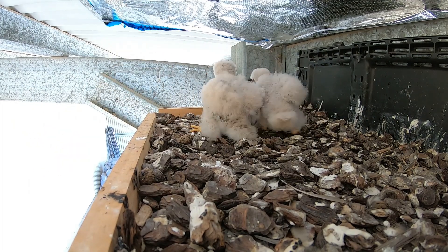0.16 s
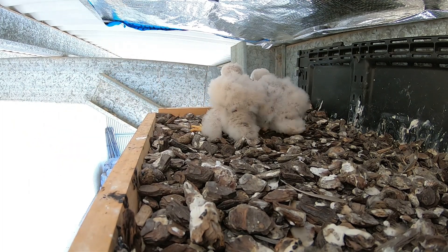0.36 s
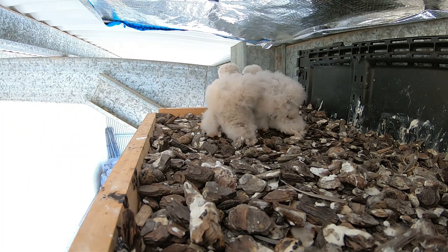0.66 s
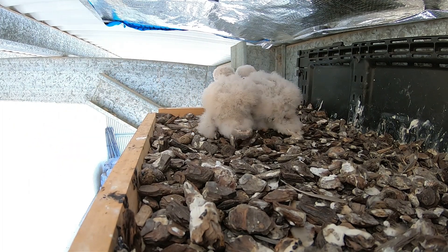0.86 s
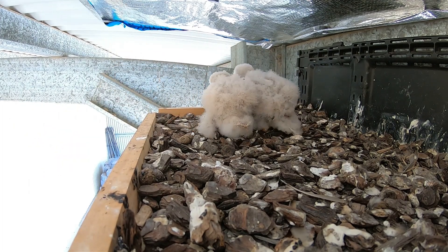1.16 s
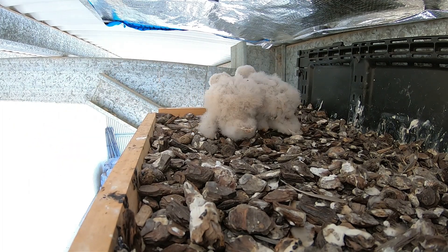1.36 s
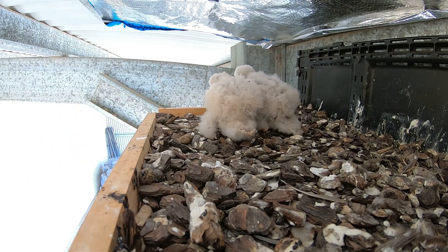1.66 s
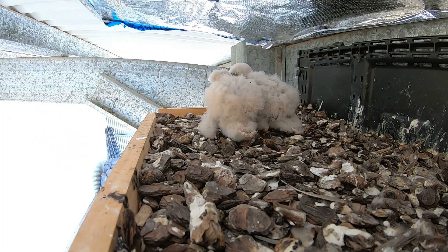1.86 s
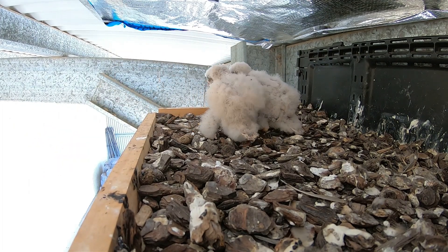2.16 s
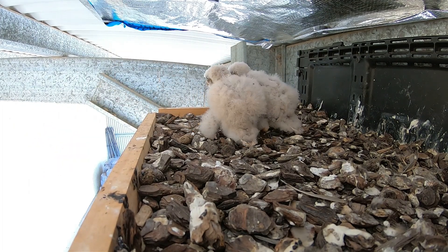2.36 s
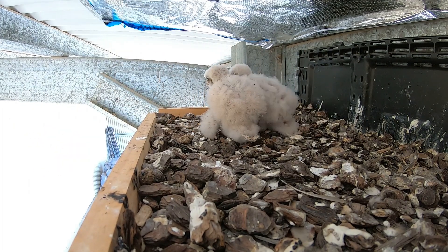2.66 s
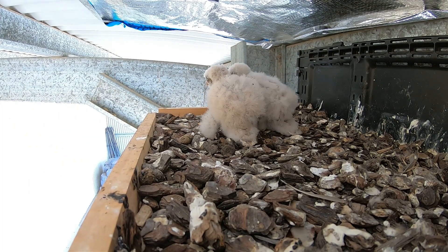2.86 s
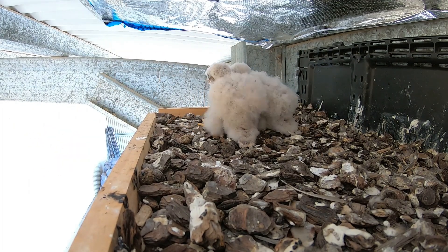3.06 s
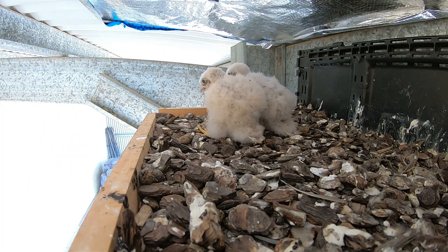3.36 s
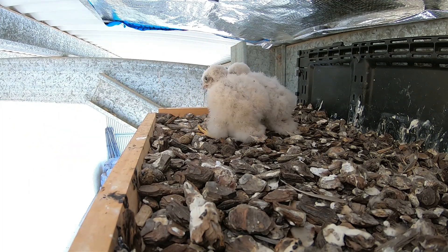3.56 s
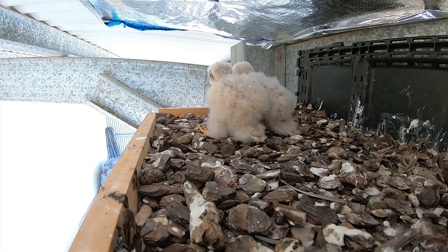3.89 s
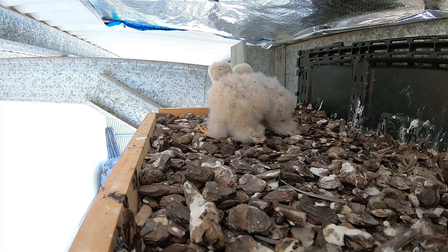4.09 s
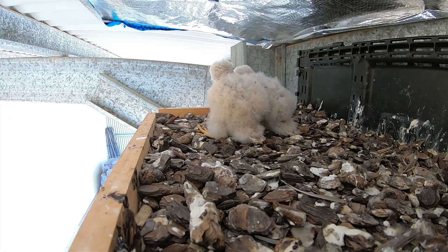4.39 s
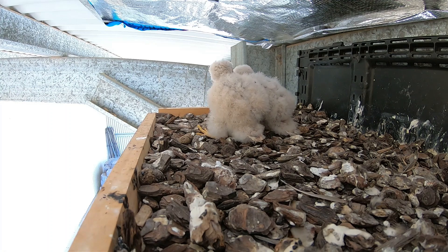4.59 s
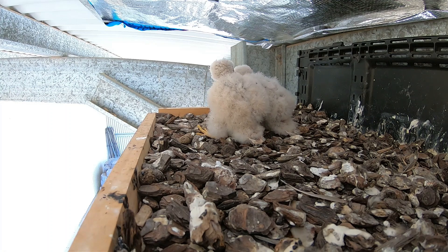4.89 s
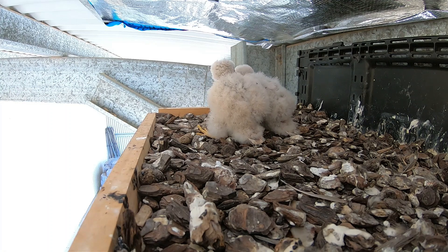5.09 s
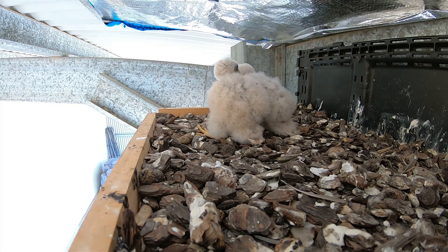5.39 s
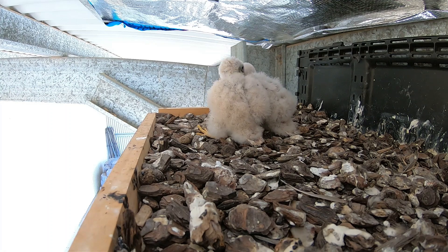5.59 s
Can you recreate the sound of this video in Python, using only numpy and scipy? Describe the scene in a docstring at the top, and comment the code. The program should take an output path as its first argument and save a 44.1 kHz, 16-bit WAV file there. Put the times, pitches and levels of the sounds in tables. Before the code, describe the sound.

Two downy falcon chicks whistle loud, harsh trilling cries in a bark-lined nest box, with faint peeps, soft footfalls and rustling chips.

```python
"""Trilling falcon chicks in a wooden nest box

Each cry is a clear whistle: harmonics of a gliding pitch, filtered by throat resonances. It trills about
13 times a second and breaks into short rasps by noise modulation. A smaller chick peeps in hoarse sines.
Feet excite the damped modes of a tray, wood chips rustle as grainy noise, wind presses on the stereo
microphone in gusts, and shaped noise gives a far hum and hiss. Wall echoes and a dull tail follow the voices."""
import sys
import numpy as np
from scipy import signal
from scipy.fft import rfft, irfft, next_fast_len
from scipy.io import wavfile

SR = 44100
rng = np.random.default_rng(int(sys.argv[2]) if len(sys.argv) > 2 else 0)


def to_wav(sig):
    """Store sig (one row per channel, or 1-D mono) as 16-bit WAV at the path in sys.argv[1].

    Samples outside -1..1 are clipped; the rate is SR.
    """
    pcm = np.clip(np.atleast_2d(sig), -1, 1) * 32767
    pcm = np.round(pcm).astype(np.int16)
    wavfile.write(sys.argv[1], SR, pcm.T)  # frames by channels


N = 253134

# Cries: f/Hz of the closing droop, basic brightness per overtone step/dB at start and at end,
# left minus right/dB, brightness gained per dB of effort, octave overtone lift/dB, lingering at turns (0-1),
# then the crests and troughs of the trill: (t/s, f/Hz, effort level/dB before the loss by gliding)
CRY_TRILLS = [ (1916, 2, 4, 0.3, -0.21, 2, 0.52, [(0.0, 2790, -30.5), (0.048, 2293, -38),
              (0.079, 2690, -28.5), (0.116, 2151, -32.5), (0.181, 2290, -46), (0.2, 2280, -39),
              (0.229, 2950, -30), (0.248, 2804, -33.5), (0.262, 2710, -22.5)]),
              (2600, 6, -4, 0.3, -0.35, -8, 0.3, [(0.288, 2750, -41.5), (0.342, 3210, -40),
              (0.382, 2446, -42), (0.401, 2980, -36), (0.415, 2730, -44)]),
              (2850, 2.5, 4.5, 1.4, -1.5, -6.3, 0.24, [(0.434, 2790, -33), (0.48, 2636, -29.5),
              (0.495, 2990, -32)]), (1810, 1.8, 1.4, 1.3, -0.54, 1, 0.38, [(0.509, 2533, -25),
              (0.524, 2888, -28), (0.555, 2365, -30.5), (0.583, 2813, -28.5), (0.626, 2263, -30),
              (0.667, 2850, -32), (0.71, 2134, -30.5), (0.74, 2840, -28), (0.758, 2770, -28),
              (0.782, 2250, -29)]), (2980, 7, 5, 0.3, -0.027, 4, 0.4, [(0.685, 2516, -24.5),
              (0.71, 2850, -38)]), (1923, -1, 3, 0.3, -0.47, -1, 0.57, [(0.77, 2752, -26.5),
              (0.798, 2813, -35), (0.825, 2550, -33), (0.866, 2907, -33.5), (0.885, 2727, -35),
              (0.93, 2820, -35.5), (0.985, 2432, -35), (1.018, 2846, -31), (1.055, 2348, -34),
              (1.083, 2707, -32.5), (1.128, 2600, -30), (1.17, 2680, -31), (1.212, 2190, -35.5),
              (1.259, 2660, -33), (1.303, 2308, -36), (1.334, 2740, -29), (1.368, 2210, -31.5)]),
              (1810, 3, -7, 0.3, -0.45, -7, 0.23, [(0.955, 2360, -44), (0.964, 2536, -23)]),
              (1960, 0.9, 3, 0.3, -0.21, -1.9, 0.23, [(1.568, 2507, -37.5), (1.616, 2195, -42),
              (1.643, 2380, -44.5), (1.682, 2198, -41), (1.714, 2443, -44), (1.747, 2186, -36.5),
              (1.795, 2305, -45.5), (1.838, 2195, -38), (1.877, 2317, -44.5), (1.905, 2205, -38),
              (1.944, 2306, -48.5), (1.972, 2233, -35)]),
              (1930, -0.2, 3, 0.3, -0.35, -0.5, 0.22, [(2.172, 2683, -37), (2.215, 2366, -37.5),
              (2.247, 2690, -36.5), (2.266, 2315, -39.5), (2.288, 2255, -40.5), (2.318, 2644, -29),
              (2.36, 2210, -41.5), (2.395, 2598, -29.5), (2.434, 2158, -42), (2.463, 2500, -29.5),
              (2.49, 2168, -40), (2.503, 2162, -33)]),
              (2048, -2.5, 4.5, 1.7, -0.35, -0.5, 0.38, [(2.696, 2313, -39.5), (2.736, 2254, -40.5),
              (2.761, 2576, -29.5), (2.807, 2162, -41), (2.845, 2440, -34), (2.872, 2423, -33),
              (2.897, 2630, -29), (2.927, 2156, -35.5), (2.96, 2075, -34.5)]),
              (1900, 0.5, -2.5, 2.7, -0.61, -6, 0.45, [(3.153, 2497, -35.5), (3.2, 2185, -32.5),
              (3.222, 2560, -35.5), (3.271, 2278, -36), (3.3, 2638, -30), (3.347, 2175, -37),
              (3.376, 2530, -30.5), (3.425, 2175, -36), (3.452, 2433, -28.5), (3.497, 2267, -34)]),
              (1996, -6.5, -0.4, 3.8, -0.46, -0.6, 0.41, [(3.726, 2268, -38), (3.77, 2190, -40),
              (3.799, 2447, -32.5), (3.839, 2169, -40.5), (3.876, 2446, -30.5), (3.92, 2117, -38.5),
              (3.972, 2438, -30.5), (3.992, 2316, -33), (4.021, 2484, -32.5), (4.05, 2215, -35),
              (4.07, 2166, -34.5)]), (1980, -2, -1, 1.9, -0.03, 2, 0.19, [(4.257, 2362, -36),
              (4.296, 2251, -34.5), (4.32, 2542, -32.5), (4.363, 2141, -35), (4.394, 2371, -32.5),
              (4.43, 2205, -30.5), (4.469, 2424, -31), (4.516, 2168, -30.5), (4.556, 2297, -30),
              (4.576, 2253, -32.5)]), (2040, -7, -3, 0.69, -0.0062, 4, 0.1, [(4.87, 2467, -33.5),
              (4.91, 2239, -33), (4.942, 2459, -30), (4.986, 2131, -36), (5.018, 2380, -31.5),
              (5.056, 2216, -33.5), (5.089, 2440, -30.5), (5.13, 2218, -29), (5.162, 2405, -29),
              (5.208, 2205, -31.5), (5.254, 2375, -32.5), (5.279, 2230, -33)]), ]
# Resonances of windpipe and open beak, about 2 kHz apart: f/Hz, gain level/dB
THROAT_GAIN = [(1300, -31), (1950, -3), (2300, -5), (2750, -0.5), (3900, -8.5), (4250, -6), (4600, -3),
               (5500, -21), (6000, -21), (6300, -17), (6650, -14.5), (7750, -41.5), (8650, -31),
               (9600, -44.5), (11000, -55.5), (15600, -69)]
# Spells in which the voice breaks up: start t/s, end t/s, added roughness (0-1)
RASP_SPELLS = [(0.022, 0.057, 0.46), (0.09, 0.1, 0.52), (0.163, 0.229, 0.36), (0.264, 0.281, 0.77),
               (0.287, 0.443, 0.65), (0.445, 0.515, 0.33), (0.49, 0.825, 0.33), (0.992, 1.086, 0.22),
               (1.335, 1.375, 0.26), (1.873, 1.891, 0.85), (1.967, 1.98, 0.25), (2.228, 2.268, 0.82),
               (2.321, 2.35, 0.2), (2.403, 2.424, 0.8), (2.47, 2.496, 0.69), (2.902, 2.942, 0.23),
               (3.237, 3.244, 0.85), (3.283, 3.344, 0.17), (3.387, 3.422, 0.65), (3.475, 3.494, 0.55)]
# One-note peeps of a smaller chick: start t/s, end t/s, f/Hz, direct rms level/dB
PEEP_NOTES = [(.297, .325, 3405, -43.5), (.33, .372, 3490, -44), (.395, .425, 3444, -39.5),
              (.455, .495, 3580, -52), (.507, .557, 3430, -38), (.579, .62, 3400, -38.5),
              (.648, .69, 3415, -36), (.72, .762, 3395, -41), (.787, .808, 3380, -59),
              (.855, .893, 3423, -38), (1.022, 1.04, 3480, -46), (3.84, 3.91, 3410, -72)]
# Faint soft tones that come and go: start t/s, end t/s, f/Hz, direct rms level/dB
FAINT_TONES = [(.8, 2.0, 342.7, -76.5), (2.0, 2.55, 246.7, -68), (3.35, 4.0, 248.8, -66),
               (4.0, 4.5, 289, -71.5), (5.425, 5.495, 860, -71), (5.55, 5.6, 1104, -76)]
# Feet on the tray: first touch t/s, relative strike level/dB, crack level relative to the strike/dB
FOOTFALLS = [(0.185, -21.5, -26), (0.198, -17, -32), (0.315, -23, -28), (0.4, -10.5, -34.5),
             (0.756, -23, -19.5), (1.341, -30.5, -52), (2.325, -35, -52), (2.767, -26, -22.5),
             (2.78, -27, -16.5), (2.797, -25, -30), (3.246, -22, -26)]
# Modes of the tray: f/Hz, relative level/dB, decay time by 60 dB t/s
TRAY_MODES = [(143, -15.5, 0.31), (187, 6, 0.07), (251, 1.5, 0.09), (310, -2, 0.045), (487, -45.5, 0.03)]
# Spectrum of the cracking chips: f/Hz, relative density level/dB
CRACK_SPECTRUM = [(300, -18.5), (4000, -20.0), (10000, -20), (12000, -38)]
# Feet scuffing through the chips: t/s, time to fall by 20 dB t/s, level/dB before the side balance
SCUFF_EVENTS = [(0.146, 0.64, -52), (.75, 0.21, -59.5), (1.307, 0.16, -52), (1.96, 0.6, -57),
                (2.3, 0.057, -54), (2.749, 0.11, -46.5), (3.227, 0.1, -45), (4.512, 0.19, -49.5),
                (4.899, 0.11, -64.5), (5.569, 0.32, -62.5)]
# Spectrum of the rustling chips: f/Hz, relative density level/dB
CHIP_SPECTRUM = [(150, -12.5), (300, -2.5), (600, -6.5), (1300, -12.5), (2000, -23.5), (6000, -36.5),
                 (15000, -84.5)]
# Spectrum of the tray rumble: f/Hz, relative density level/dB
RUMBLE_SPECTRUM = [(60, -34.5), (120, -6), (165, 4.5), (200, 6.5), (260, 1), (350, -5.5), (900, -57.5)]
# Gusts on the microphone: t/s at the top, level/dB added to the calm wind
GUSTS = [(0.277, -45), (0.454, -45), (0.645, -60.5), (0.837, -48), (1.049, -59.5), (1.409, -51),
         (2.808, -61.5), (3.298, -52), (3.424, -55.5), (4.049, -54.5), (4.221, -49), (4.518, -60),
         (4.952, -57)]
# Spectrum of the wind pressure: f/Hz, relative density level/dB
WIND_SPECTRUM = [(10, -26.0), (35, 6.0), (60, -1), (110, -9.0), (200, -43), (400, -85)]
# Wavering hum: f/Hz, width of each of two resonances/Hz, rms level/dB
HUM_BANDS = [(181.6, 43, -73)]
# Spectrum of the far air noise: f/Hz, relative density level/dB
AIR_SPECTRUM = [(300, -24), (550, -15), (900, -13.5), (1500, -18), (2200, -19), (3200, -57), (5500, -39),
                (7000, -30), (10500, -32), (11500, -40), (15700, -72)]
# Left-right likeness of the noises: f/Hz, correlation (-1 to 1)
EAR_LIKENESS = [(30, 0.1), (100, 0.7), (220, 0.69), (400, 0.39), (800, -0.6), (1300, -0.66), (2500, 0.4),
                (4300, 0.5), (8000, -0.2)]
# Side wall echoes: delay t/s, level/dB before the treble emphasis
WALL_ECHOES = [(.00009, -14), (.00066, -9), (.00177, -21.5), (.0031, -21), (.0047, -6.5)]

ATTACK_S, RELEASE_S = 0.0045, 0.007
DROOP_S, DROOP_DB = 0.023, 1.5   # after the last turn: duration of the droop, change of effort meanwhile
DROOP_SWING = 0.88   # share of a half cosine that the droop runs before the voice stops
USUAL_HZ, USUAL_DB = 2400, -33   # reference pitch and effort for the brightness
BRIGHT_DB_PER_KHZ = -4   # overtones stand out when the voice is lower than usual
GLIDE_DB_PER_KHZ_S = 0.2639   # loss of effort while the pitch glides
FALL_LIFT_DB, FALL_KHZ_PER_S = 3, 6   # limit of the octave swell, glide rate that scales it
RASP_EDGE_S = 0.004
GUST_HALF_S = 0.063   # from the top of a gust to 1/e of it
SHRILL_HZ, SHRILL_WIDTH_HZ, SHRILL_DB = 4340, 820, -67.5   # steady far hiss: same columns as the hum
AIR_DB = -70.5   # rms
YARD_T60_S, YARD_DB, YARD_CUT_HZ = 0.48, -18, 1900
CUTOFF_HZ = 15700


def trill(turns, droop_hz, linger):
    """Cosine interpolation: pitch and effort swing from turn to turn, slowest at each turn."""
    droop = (turns[-1][0] + DROOP_S, droop_hz, turns[-1][2] + DROOP_DB)
    turn_s, turn_hz, turn_db = np.transpose(turns + [droop])
    i = np.arange(round(turn_s[0] * SR), round(turn_s[-1] * SR))
    count = np.arange(len(turn_s))
    place = np.interp(i / SR, turn_s, count)
    reach = np.where(place < len(turn_s) - 2, 1, DROOP_SWING)
    trilling = np.minimum(place, len(turn_s) - 2)
    place -= np.clip(linger, 0, 1) * np.sin(2 * np.pi * trilling) / (4 * np.pi)
    swing = (1 - np.cos(np.pi * reach * (place % 1))) / (1 - np.cos(np.pi * reach))
    place = place // 1 + swing
    return i, turn_s, np.interp(place, count, turn_hz), np.interp(place, count, turn_db)


def throat(voices):
    """Source-filter principle: windpipe and beak weight the harmonics by a fixed resonance curve."""
    size = next_fast_len(N + SR // 10)
    hz = np.maximum(np.fft.rfftfreq(size, 1 / SR), 10)
    return irfft(rfft(voices, size) * amp(at_hz(THROAT_GAIN, hz)), size)[:, :N]


def cries():
    """Harmonic synthesis with irregular modulation: uneven membrane beats shake phase and level in a rasp."""
    out = np.zeros((2, N))
    rough = 0.023 + sum(depth * gate(a, b, RASP_EDGE_S) for a, b, depth in RASP_SPELLS)
    shake, flutter, breath = drift(730), drift(240), rng.standard_normal(N)
    # the harmonics waver quickly in level, each following one of three random courses/dB
    waver = np.array([1.4 * drift(22), 2.6 * drift(40), 3.2 * drift(60)])
    for droop_hz, first_db, last_db, pan_db, per_db, octave_db, linger, turns in CRY_TRILLS:
        i, turn_s, pitch, effort = trill(turns, droop_hz, linger)
        t = i / SR
        start, end = turn_s[[0, -1]]
        phase = 2 * np.pi * np.cumsum(pitch) / SR + .5 * rough[i] * shake[i]
        above_khz = (pitch - USUAL_HZ) / 1000
        glide = np.gradient(above_khz) * SR   # kHz per s
        effort -= GLIDE_DB_PER_KHZ_S * np.abs(glide)
        bright = np.interp(t, [start, end], [first_db, last_db])
        bright += BRIGHT_DB_PER_KHZ * above_khz + per_db * (effort - USUAL_DB)
        bright = np.clip(bright, -12, 6)
        # the octave swells while the pitch falls and thins while it rises
        octave = octave_db - FALL_LIFT_DB * np.tanh(glide / FALL_KHZ_PER_S)
        voice = 0.19 * rough[i] * breath[i]   # air rushes past membranes that close badly
        for k in range(7):
            level_db = min(k, 3) * bright + (k == 1) * octave + waver[k % 3, i]
            voice += amp(level_db) * np.sin((k + 1) * phase + k)
        already_sounding = start == 0   # no attack for a cry under way at time 0
        attack = (t - start + already_sounding) / ATTACK_S
        fade = np.clip(np.minimum(attack, (end - t) / RELEASE_S), 0, 1)
        gain = np.sqrt(2) * amp(effort + pan_db / 2 * np.array([[1], [-1]]))
        out[:, i] += gain * voice * fade * (1 + 0.4 * rough[i] * flutter[i])
    return throat(out)


def notes(table, hoarse):
    """Phase modulation: sine whistles arch slightly in pitch, and random phase makes them hoarse."""
    t, out = np.arange(N) / SR, 0
    flutter = drift(200) + 0.63 * drift(1100)
    for a, b, hz, level_db in table:
        # this phase raises the pitch by up to 1.6 percent of hz per... scaled so that it peaks midway
        arch = 0.032 * hz * (b - a) * np.cos(np.pi * (t - a) / (b - a))
        whistle = np.sin(2 * np.pi * hz * t - arch + hoarse * flutter)
        out = out + amp(level_db) * gate(a, b, 0.0082) * whistle
    return np.sqrt(2) * out


def box(near):
    """Image-source echoes reach the two ports with opposite sign; the yard returns a decaying noise tail."""
    x = near.mean(axis=0)
    i = np.arange(N)
    side = sum(amp(db) * np.interp(i - lag * SR, i, x, left=0) for lag, db in WALL_ECHOES)
    side = signal.lfilter([1, -.4], [1], side)   # the ports differ more in the treble
    t = np.arange(SR) / SR
    tail = rng.standard_normal((2, SR)) * amp(-60 * t / YARD_T60_S) * np.clip(t / 0.0099, 0, 1)
    tail = signal.sosfilt(signal.butter(1, YARD_CUT_HZ, fs=SR, output="sos"), tail)
    tail /= np.sqrt(np.sum(tail ** 2, axis=1, keepdims=True))
    yard = signal.fftconvolve(x[None], tail, axes=1)[:, :N]
    return near + side * [[1], [-1]] + amp(YARD_DB) * yard


def thumps():
    """Modal excitation: a footfall is an impulse to the damped modes of the tray; the chips under it crack."""
    out, crack = np.zeros(N), np.zeros(N)
    at, strike_db, crack_db = np.transpose(FOOTFALLS)
    at = np.round((at + 0.0027) * SR).astype(int)   # tray and chips answer just after the first touch
    chance_db = rng.normal(0, 2.5, (len(at), len(TRAY_MODES)))
    for k, (hz, level_db, t60) in enumerate(TRAY_MODES):
        clicks = np.full(N, 1e-18)
        clicks[at] = amp(strike_db + level_db - 18.0 + chance_db[:, k])
        r, w = amp(-60 / (t60 * SR)), 2 * np.pi * hz / SR
        out += signal.lfilter([0, np.sin(w)], [1, -2 * r * np.cos(w), r * r], -clicks)
    # a padded foot lands softly
    out = signal.sosfilt(signal.butter(2, [90, 500], "band", fs=SR, output="sos"), out)
    crack[at] = amp(strike_db + crack_db)
    crack = signal.lfilter([1], [1, -amp(-60 / (0.09 * SR))], crack + 1e-18)   # falls 60 dB in 0.09 s
    return out * amp([[-.8], [.8]]) + crack * coloured(rng.standard_normal((2, N)), CRACK_SPECTRUM)


def shuffling():
    """Amplitude-modulated noise: chips rustle in grains after each scuff; the tray rumbles, more under feet."""
    t = np.arange(N) / SR
    feet = np.zeros(N)
    for start, length, db in SCUFF_EVENTS:
        fall_db = 20 * np.maximum(t - start, 0) / length
        feet += amp(db - fall_db) * np.clip((t - start) / 0.022, 0, 1)
    grains = rng.standard_normal((2, N)) * amp(3.0 * drift(120))
    lumps = rng.standard_normal((2, N)) * amp(1.53 * drift(7.1))
    rustle = feet * coloured(grains, CHIP_SPECTRUM)
    rumble = (amp(-64) + 0.57 * feet) * coloured(lumps, RUMBLE_SPECTRUM)
    return (rustle + rumble) * amp([[-.8], [.8]])


def wind():
    """Turbulent pressure: low-frequency noise at the microphone ports swells in bell-shaped gusts."""
    t = np.arange(N) / SR
    swell = amp(-76.0) + sum(amp(db) * np.exp(-((t - s) / GUST_HALF_S) ** 2) for s, db in GUSTS)
    return swell * coloured(rng.standard_normal((2, N)), WIND_SPECTRUM)


def background():
    """Resonant filtering: narrow noise bands give a wavering hum and a shrill hiss over far air noise."""
    out = amp(AIR_DB) * coloured(rng.standard_normal((2, N)), AIR_SPECTRUM)
    for hz, width_hz, level_db in HUM_BANDS + [(SHRILL_HZ, SHRILL_WIDTH_HZ, SHRILL_DB)]:
        white = rng.standard_normal((2, N))
        mid, side = resonance(resonance(white, hz, width_hz), hz, width_hz)
        out = out + amp(level_db) * rms_one(both_ears(mid, side, hz))
    return out


def amp(db):
    """Decibel law: the amplitude ratio of a level."""
    return 10 ** (np.asarray(db) / 20)


def rms_one(x):
    """Normalization of the mean power: scaled to rms 1."""
    return x / np.sqrt(np.mean(x ** 2) + 1e-20)


def at_hz(points, hz):
    """Linear interpolation of a spectrum table on a logarithmic frequency axis."""
    table = np.array(points)
    return np.interp(np.log(hz), np.log(table[:, 0]), table[:, 1])


def drift(rate):
    """Low-pass filtered noise: smooth chance of rms 1 that changes about rate times a second."""
    r = np.exp(-2 * np.pi * rate / SR)
    white = rng.standard_normal(N + SR)
    return rms_one(signal.lfilter([1], [1, -2 * r, r * r], white)[SR:])   # the filter settles for 1 s


def gate(start, end, edge):
    """Raised-cosine window: 1 between start and end, with soft edges."""
    t = np.arange(N) / SR
    return np.sin(np.pi / 2 * np.clip(np.minimum(t - start, end - t) / edge, 0, 1)) ** 2


def resonance(x, hz, width_hz):
    """Damped oscillator: a two-pole peak of gain 1."""
    r = np.exp(-np.pi * width_hz / SR)
    poles = [1, -2 * r * np.cos(2 * np.pi * hz / SR), r * r]
    return signal.lfilter(np.array([1, 0, -1]) * (1 - r * r) / 2, poles, x)


def both_ears(mid, side, hz):
    """Interchannel correlation: sum and difference noises are weighted to the likeness at this frequency."""
    alike = np.clip(at_hz(EAR_LIKENESS, hz), -1, 1)
    return np.sqrt(1 + alike) * mid + np.sqrt(1 - alike) * side * [[1], [-1]]


def coloured(white, spectrum):
    """Spectral shaping: stereo noise takes on a spectrum and a likeness, at rms 1."""
    hz = np.maximum(np.fft.rfftfreq(N, 1 / SR), 10)
    mid, side = rfft(white) * amp(at_hz(spectrum, hz))
    return rms_one(irfft(both_ears(mid, side, hz), N))


def scene():
    """Superposition: the pressures of all sources add at the microphone."""
    voices = cries() + notes(PEEP_NOTES, hoarse=0.32) + notes(FAINT_TONES, hoarse=0.089)
    return box(voices) + thumps() + shuffling() + wind() + background()


def record(dry):
    """Band limiting: a steep elliptic low-pass removes the top."""
    return signal.sosfilt(signal.ellip(12, .5, 70, CUTOFF_HZ, fs=SR, output="sos"), dry)


dry = scene()
out = record(dry)
to_wav(out)
```